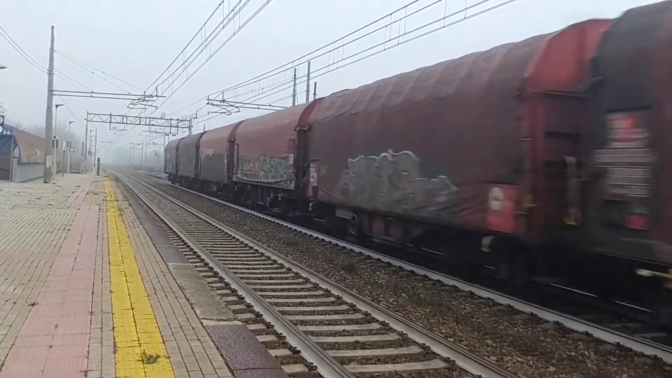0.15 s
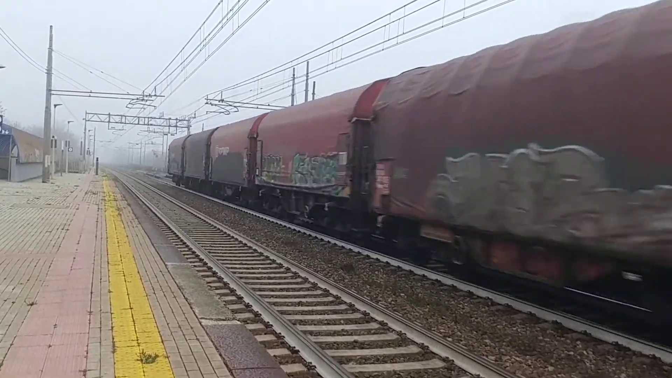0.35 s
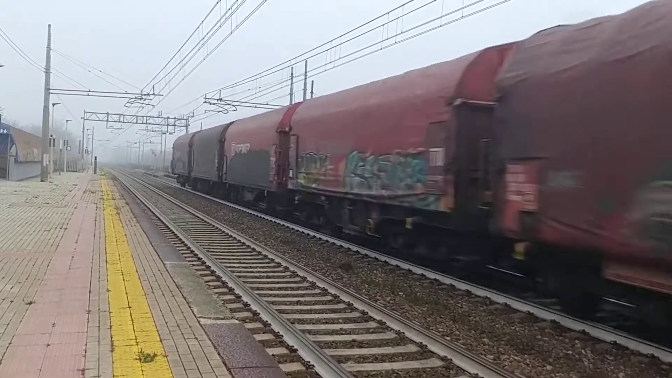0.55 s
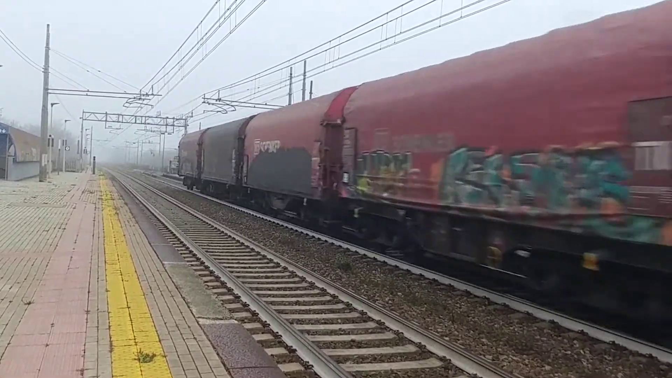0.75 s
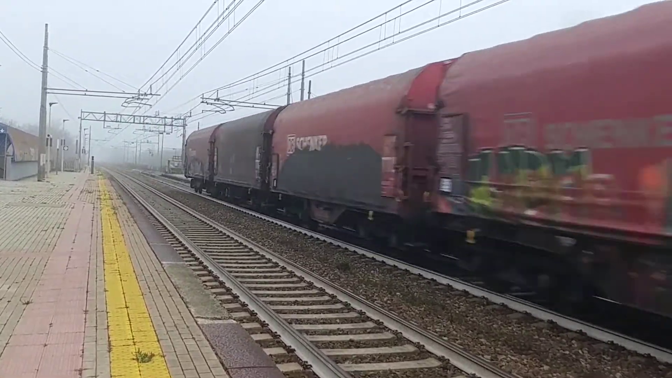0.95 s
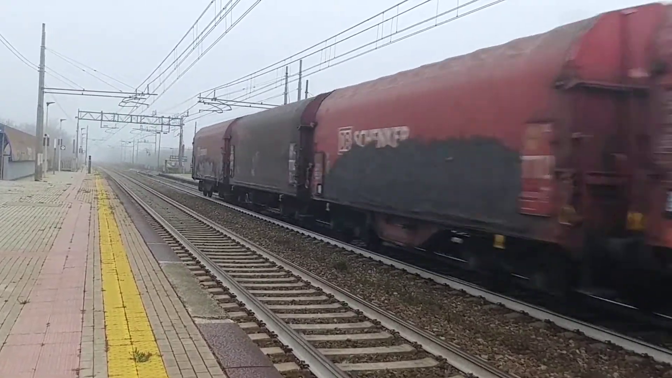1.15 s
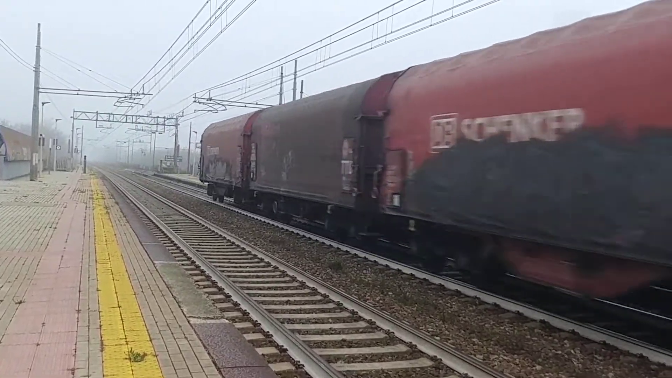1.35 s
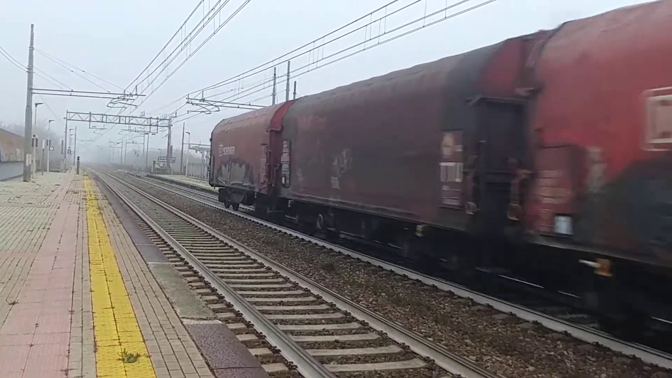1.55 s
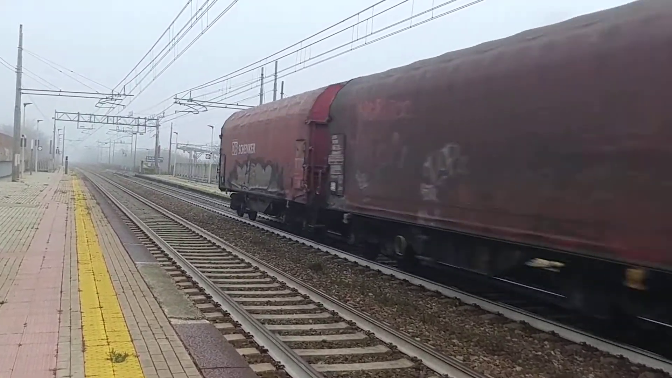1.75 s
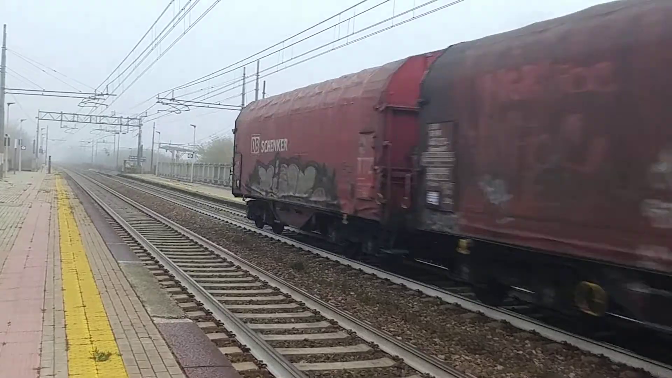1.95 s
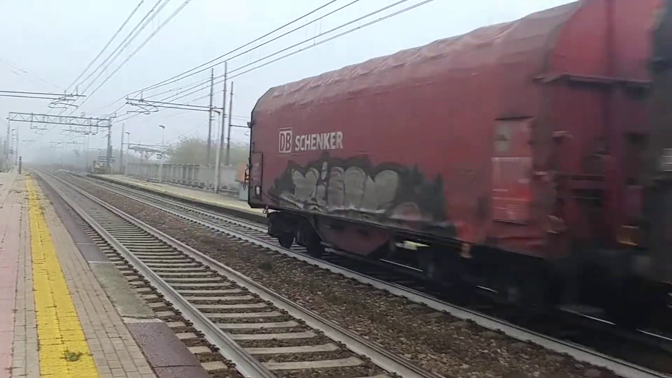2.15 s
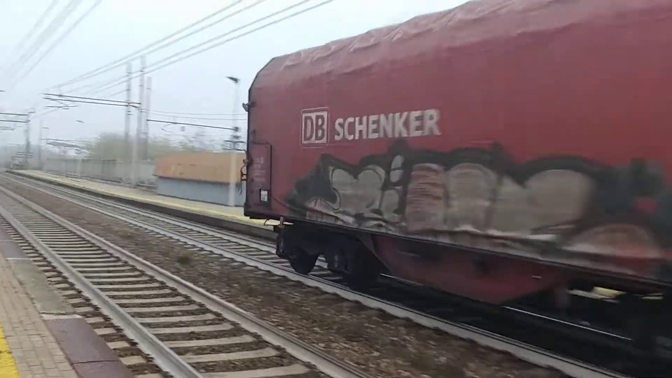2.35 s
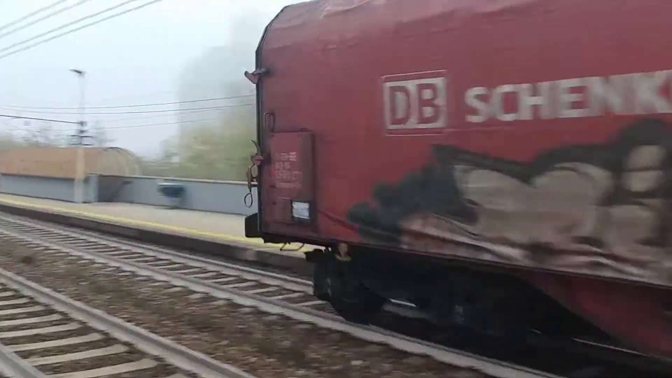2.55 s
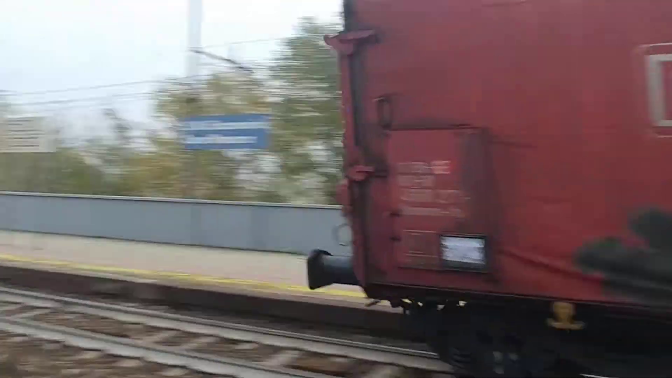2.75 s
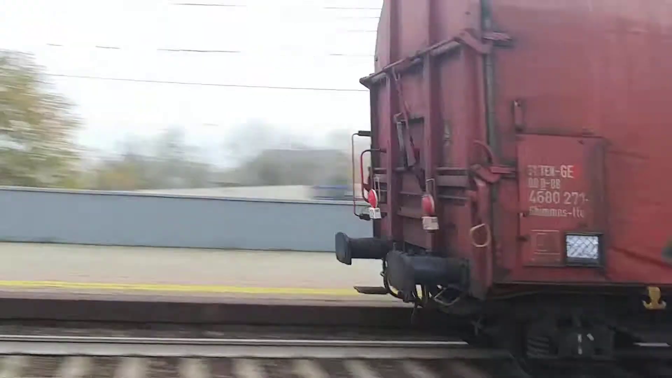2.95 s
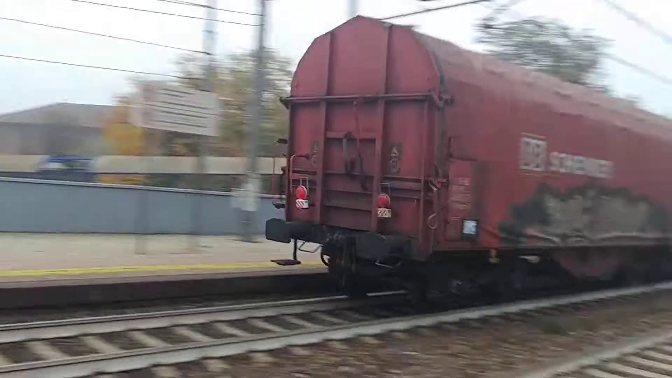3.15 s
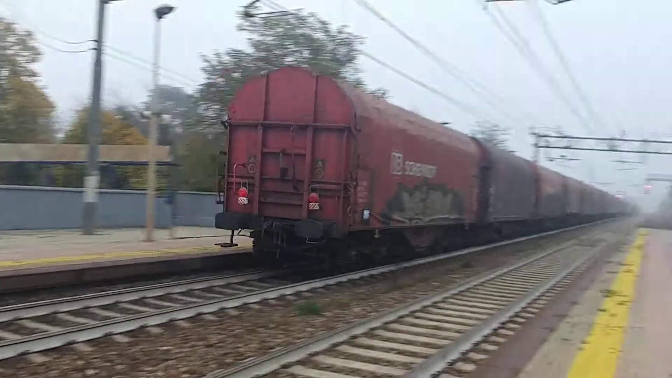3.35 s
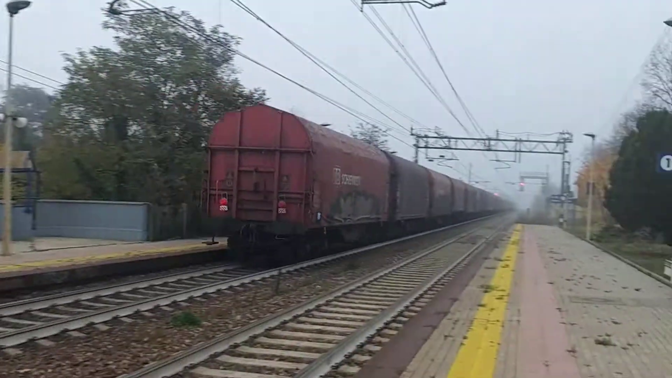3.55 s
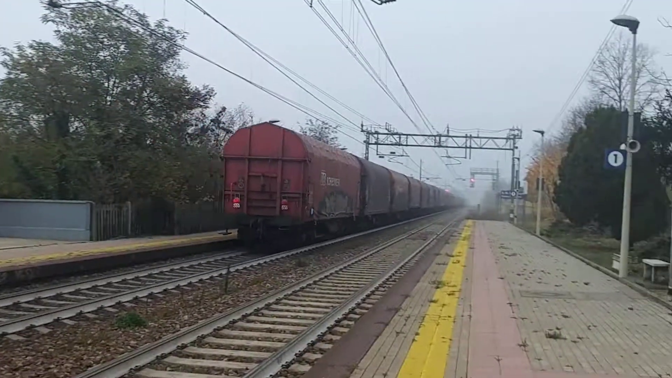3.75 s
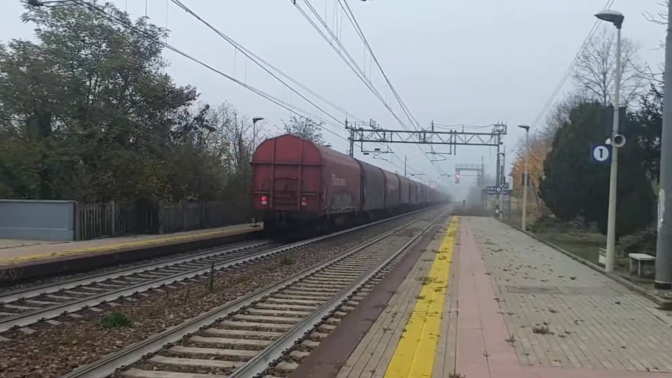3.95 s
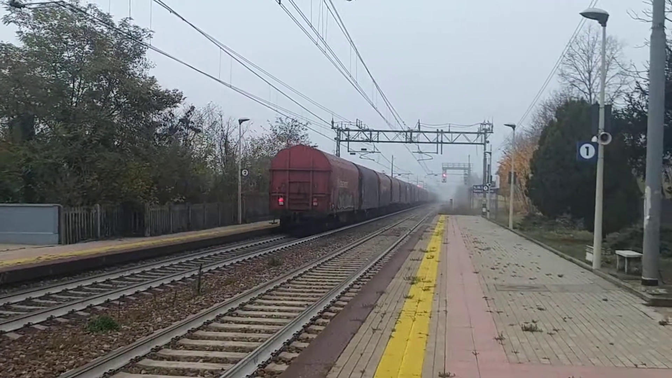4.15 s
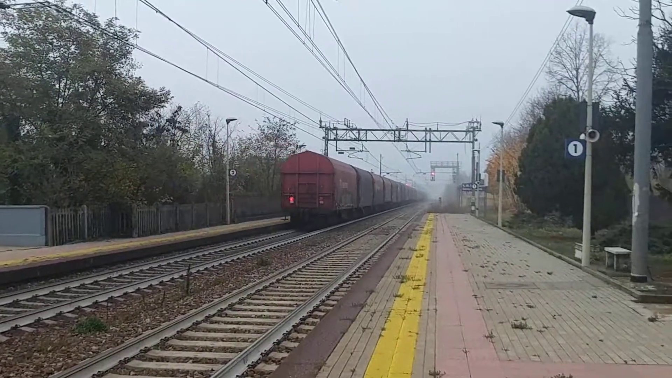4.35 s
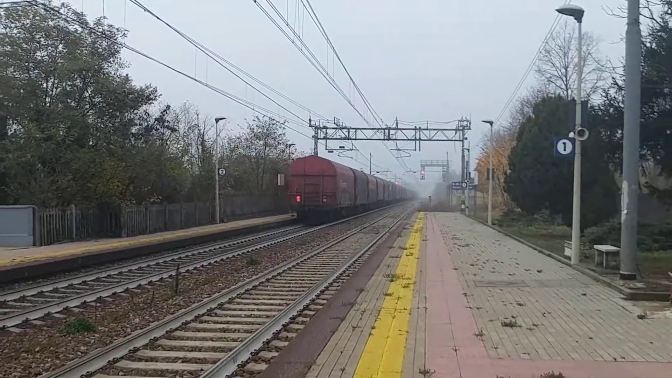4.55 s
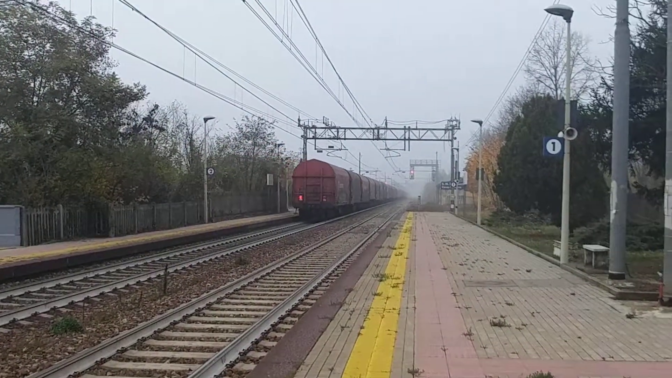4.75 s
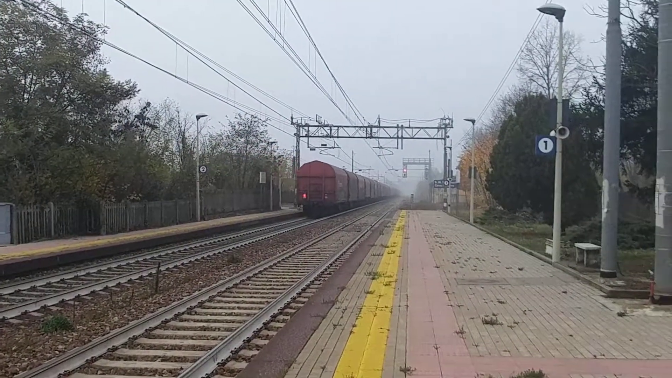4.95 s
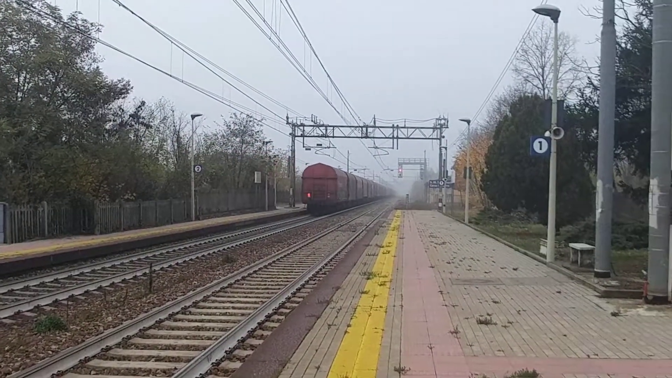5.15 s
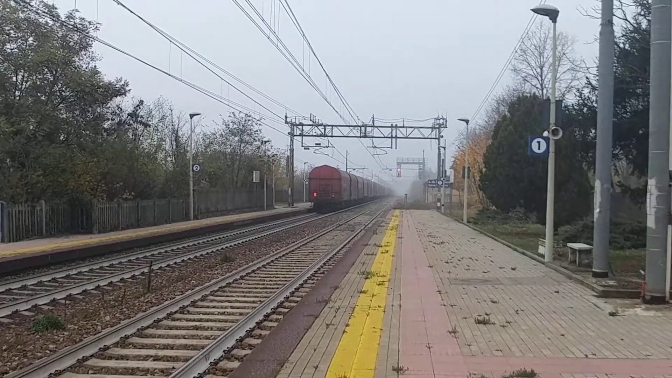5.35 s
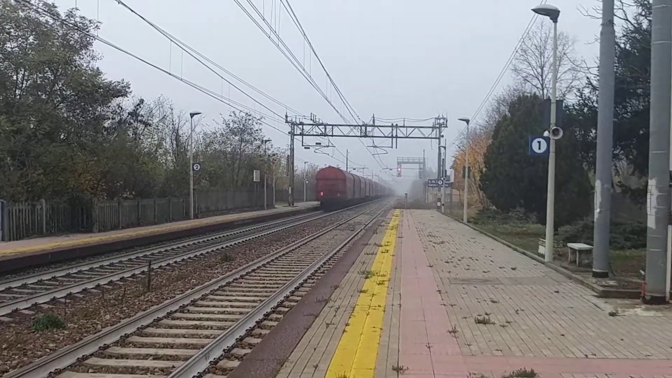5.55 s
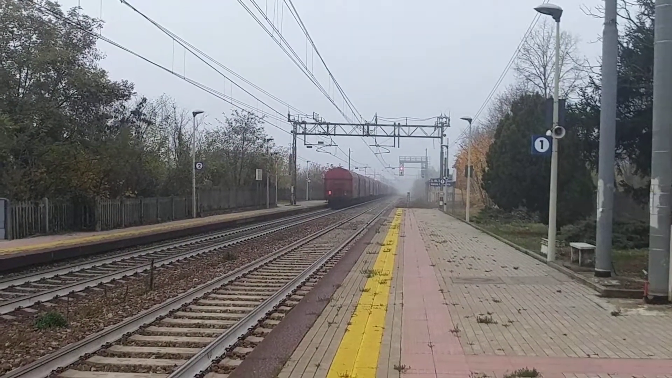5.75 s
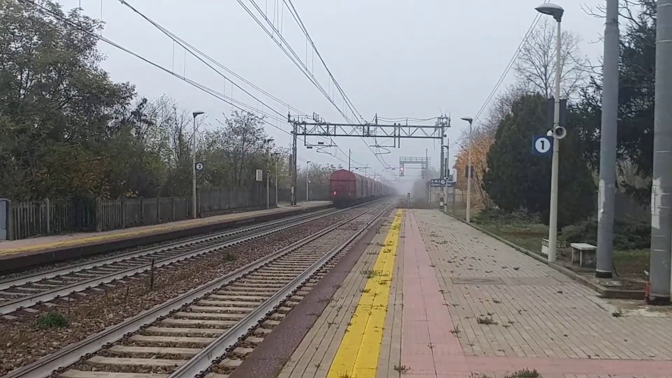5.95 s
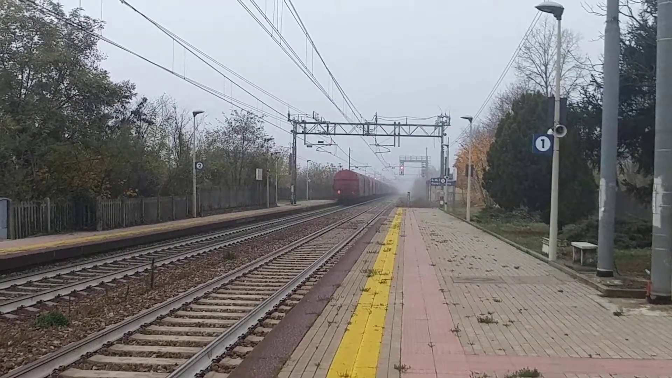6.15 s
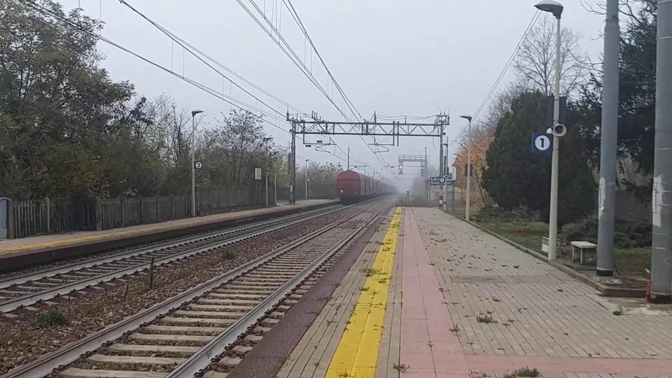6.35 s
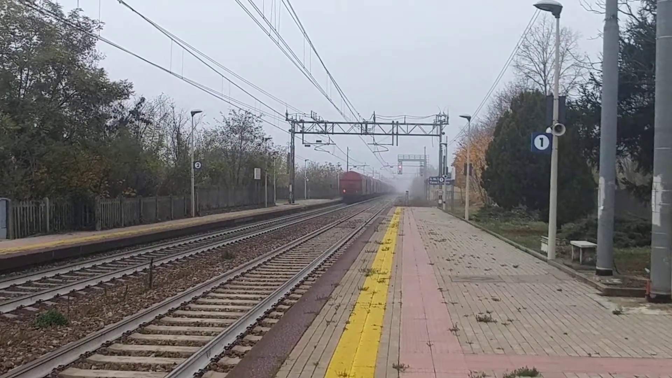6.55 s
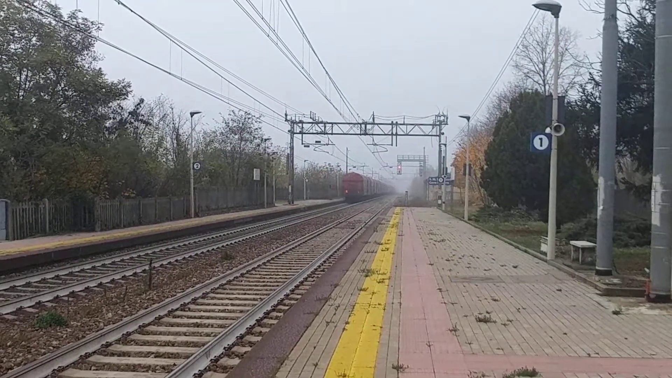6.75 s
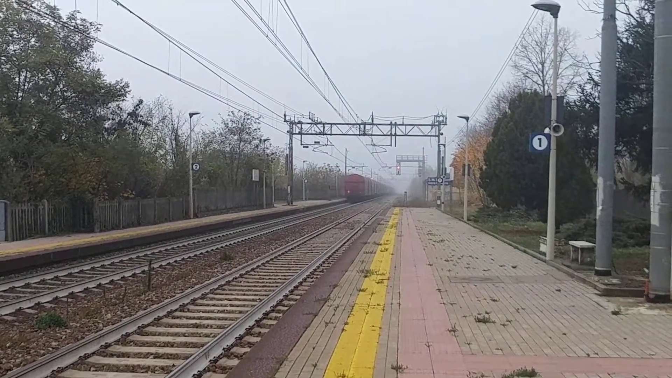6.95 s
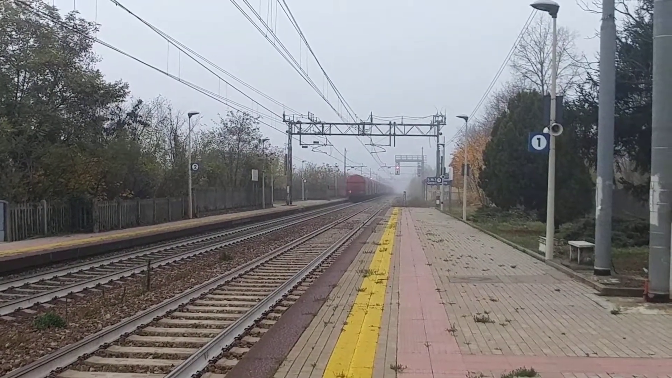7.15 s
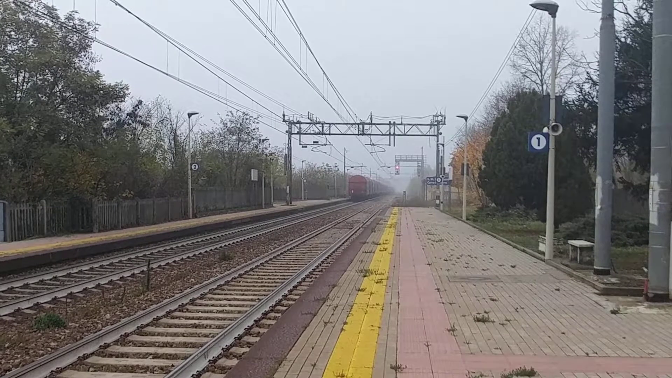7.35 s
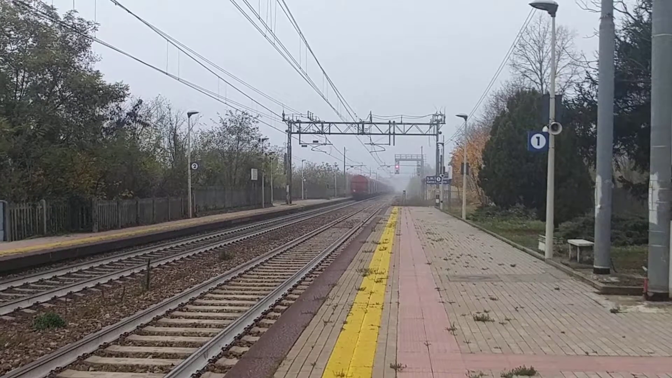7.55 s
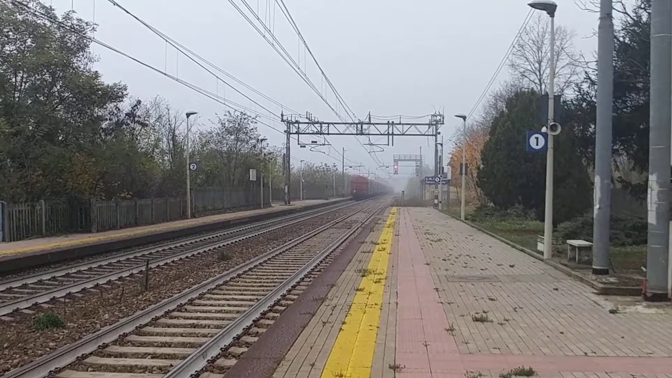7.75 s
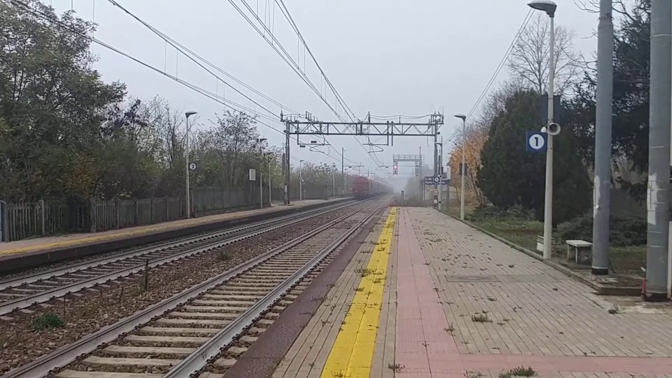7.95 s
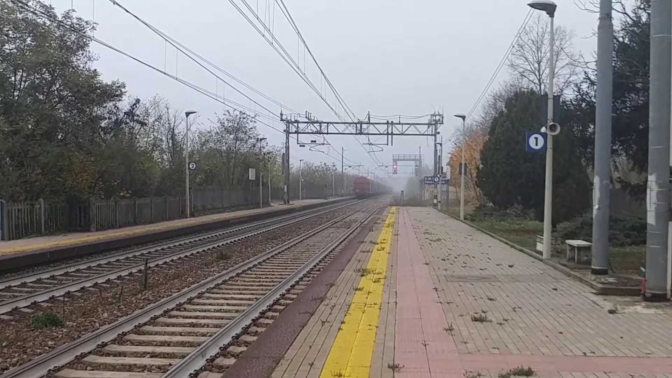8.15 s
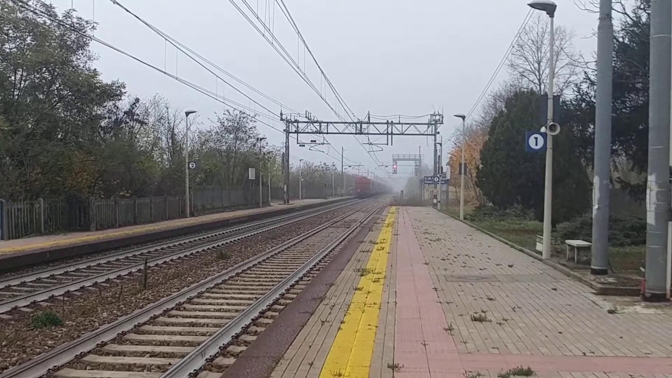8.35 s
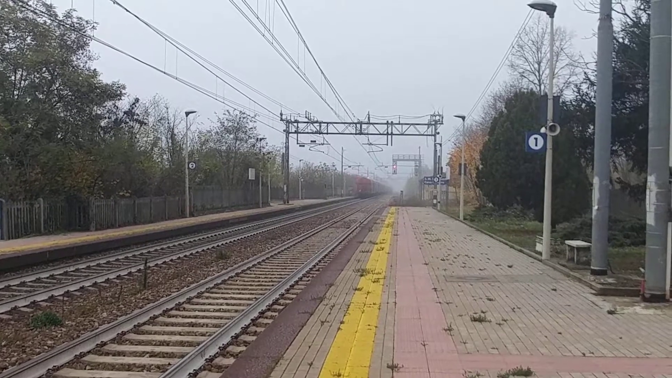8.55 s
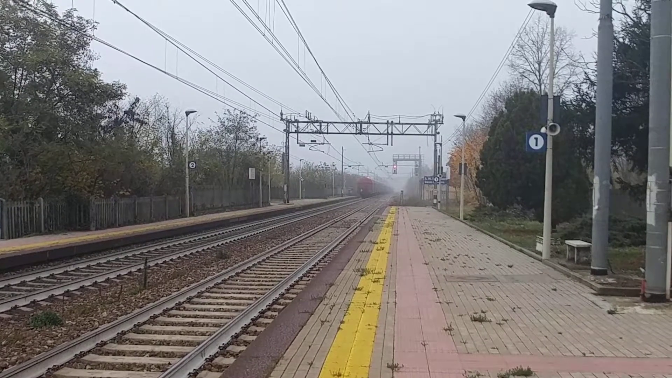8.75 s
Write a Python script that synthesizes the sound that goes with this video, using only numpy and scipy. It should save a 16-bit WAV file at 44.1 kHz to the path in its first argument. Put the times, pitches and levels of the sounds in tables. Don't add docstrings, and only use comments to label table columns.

```python
import sys
import numpy as np
from scipy import signal
from scipy.io import wavfile
from scipy.ndimage import uniform_filter1d, minimum_filter1d

SR = 44100
rng = np.random.default_rng(int(sys.argv[2]) if len(sys.argv) > 2 else 0)


def materialize(psi):
    bounded = np.clip(np.atleast_2d(psi).T, -1, 1)
    quanta = np.round(bounded * 32767).astype(np.int16)
    wavfile.write(sys.argv[1], SR, quanta)


def elevation(decibels):
    levels = np.asarray(decibels, float)
    return 10 ** (levels / 20)


N = 388521

SPEED_M_S, TRACK_GAP_M, SOUND_SPEED_M_S = 22.45, 11.7, 343
TAIL_ABREAST_S = 3.1
FAR_FROM_S = 3.79


def evened(x):
    return x / np.sqrt(np.mean(x ** 2) + 1e-20)


def over_hz(points, hz):
    f, *columns = np.transpose(points)
    return np.array([np.interp(np.log(hz + 1), np.log(f + 1), c) for c in columns])


def over_time(rows, t):
    s, *columns = np.transpose(rows)
    return np.array([np.interp(t, s, c) for c in columns])


# t/s, level/dB
ROAR = [(0, -10.5), (1.4, -5), (2.4, -5.8), (2.9, -5.6), (3.2, -4), (3.4, -9), (3.6, -13.5), (3.8, -15),
        (4.0, -18.5), (4.4, -20), (4.8, -21), (5.6, -23), (6.6, -24), (7.6, -25), (8.81, -27.5)]


def roar_db(t):
    return over_time(ROAR, t)


def camera(t):
    aim_from_deg, drift_deg_s = 14.8, 1.9
    turn_mid_s, turn_half_s = 2.84, 0.17
    ahead_m, short_deg = 0.83, 2.5
    swing = 0.5 + 0.5 * np.tanh((t - turn_mid_s) / turn_half_s)
    tail_m = SPEED_M_S * (t - TAIL_ABREAST_S)
    last_wagon = np.arctan2(TRACK_GAP_M, -tail_m - ahead_m) - np.radians(short_deg)
    return (1 - swing) * np.radians(aim_from_deg + drift_deg_s * t) + swing * last_wagon


# f/Hz, width/Hz, left/dB, right/dB, right lead/rad
MODES_AT_REST = [(69.6, 28.5, 14, 13, -0.024), (215.7, 70, 4.5, 2.5, -0.4), (618, 266, 13.5, 11, -0.49),
                 (836, 190, 4.5, -1.5, -0.15), (1317, 176, 13.5, 8.5, 0.65), (1928, 150, 10, 6, 0.47),
                 (2114, 150, -0.5, 10, 0.61), (2662, 55, 1, 6.5, -0.17), (3265, 240, 5, -14, -1.7),
                 (3780, 120, 2, 1, -0.55), (4346, 71, -1, 8, 0.16), (5120, 200, -14, 7, -0.77),
                 (5670, 145, 9, 2.5, 1), (6240, 220, -10, 7, 0.41), (7040, 170, 6, 4, 1),
                 (7700, 450, -20, 4, -0.69), (11260, 1100, 5, -4, 1)]
# f/Hz, likeness/0-1
ALIKE = [(30, 1), (100, 1), (250, 1), (700, 0.28), (1050, 0.26), (2200, 0.05), (3000, 0.42), (6000, 0.05),
         (12000, 0.44)]


def wheel_voice(hz):
    left, right = np.ones(len(hz)), np.ones(len(hz))
    both = np.clip(over_hz(ALIKE, hz)[0], 0, 1) + 0j
    for mode_hz, width_hz, left_db, right_db, lead_rad in MODES_AT_REST:
        bell = 1 / (1 + (2 * (hz - mode_hz) / width_hz) ** 2) ** 1.7
        left = left + elevation(2 * left_db) * bell
        right = right + elevation(2 * right_db) * bell
        both = both + elevation(left_db + right_db) * np.exp(1j * lead_rad) * bell
    return left, right, both


WHEELS_DB = [12.2, 7.6, 3, 7, 6.3, 9.4, 5.6, 5.9, 3.9]


def passing(t, hz):
    group_count, group_gap_m = 16, 12.34
    mic_gap_m, front_db = 0.15, 2.5
    body_bend = 1.6
    voice_left, voice_right, voice_both = wheel_voice(hz)
    heading = camera(t)
    left, right, both = 0, 0, 0
    for k in range(group_count):
        strength_db = WHEELS_DB[min(k, len(WHEELS_DB) - 1)]
        along_m = SPEED_M_S * (t - TAIL_ABREAST_S) + k * group_gap_m
        far_m = np.hypot(along_m, TRACK_GAP_M)
        bearing = np.arctan2(TRACK_GAP_M, -along_m) - heading
        power = (elevation(2 * (strength_db + front_db * np.cos(bearing))) / far_m ** 2)[:, None]
        emitted_hz = np.outer(1 + SPEED_M_S * along_m / far_m / SOUND_SPEED_M_S, hz)
        delay_s = mic_gap_m * np.tanh(body_bend * np.sin(bearing)) / SOUND_SPEED_M_S
        lead_rad = 2 * np.pi * np.outer(delay_s, hz)
        left = left + power * np.interp(emitted_hz, hz, voice_left)
        right = right + power * np.interp(emitted_hz, hz, voice_right)
        both = both + power * np.interp(emitted_hz, hz, voice_both) * np.exp(1j * lead_rad)
    return left, right, both / np.sqrt(left * right)


def far_share(t):
    since_s = np.maximum(t - FAR_FROM_S, 0)
    return 0.089 + 0.49 * (1 - np.exp(-since_s / 0.45)) + 0.12 * since_s


# t/s, f/Hz, half length/s, width/Hz, level/dB
RINGING = [(0.14, 3400, 0.091, 50, 12), (.62, 2800, .05, 50, 7), (0.65, 5400, .12, 88, 4),
           (1.14, 3860, .2, 80, 4.5), (1.44, 966, .12, 31, 7.5), (1.86, 310, .35, 100, 3),
           (2.77, 960, 0.13, 81, 3.5), (1.35, 3150, .077, 91, 8), (1.4, 2180, 0.8, 530, 0.5),
           (2.35, 1390, 0.29, 61, 7.5), (3.12, 810, .3, 260, 5), (2.28, 520, 0.15, 90, 3.5),
           (1.04, 3120, .1, 70, 7), (3.2, 3340, .2, 78, 7), (3.81, 154, 0.2, 100, 7.5),
           (8.6, 580, 0.41, 130, 3.5), (8.0, 70, .25, 50, 3.5), (3.39, 146, 0.16, 78, 7.5),
           (3.16, 1246, 0.7, 32, 5)]


def ringing_db(t, hz):
    sag_per_s = 0.16
    lift_db = 0
    for s, start_hz, half_s, width_hz, db in RINGING:
        since_s = t[:, None] - s
        off = (hz - start_hz * (1 - sag_per_s * since_s)) / width_hz
        lift_db = lift_db + db * np.exp(-off ** 2 - (since_s / half_s) ** 2)
    return lift_db


# f/Hz, density/dB per Hz
ABREAST = [(25, -53), (42, -26), (58, -11.5), (120, -7), (310, -1.5), (440, -9), (930, -1.5), (1560, -10),
           (2200, -15), (2550, -17.5), (3500, -16.5), (7000, -27), (12000, -32.5), (15500, -38.5)]
# f/Hz, density/dB per Hz
GONE = [(25, -47), (42, -12), (58, -4.5), (120, -5.5), (250, -2.5), (380, -15), (950, -15.5), (1500, -20.5),
        (2300, -28.5), (3500, -27.5), (6500, -41.5), (8200, -44), (11400, -61), (15500, -87)]
# f/Hz, left/dB, right/dB
PORTS = [(1470, -7, -4.5), (2530, -2, -2), (3600, -2.5, -1), (5060, -0.5, -1), (5950, -2.5, -0.5),
         (7510, 0.5, 7.5), (8380, -2, -1.5), (8930, -1.5, -10), (9800, 10.5, -9), (10740, 1.5, 8),
         (11400, -1, -0.5)]
# f/Hz, level/dB
SHADE = [(300, -3.5), (1500, 3), (2500, 4), (2850, -5), (3250, 0), (3550, 0.5), (3850, -1.5), (4200, 4.5),
         (8000, -2.4)]
LAYER_EDGES_HZ = [450, 1600, 8800]


def train():
    frame, hop = 4096, 1024
    layer_db = np.array([[-6], [0], [-5], [-25.5]])
    fog_loss_db_per_100m = [-0.3, 0, 5.5, 11]
    tail_roar_db, tail_roar_s = 1.5, 0.35
    patch_db, top_patch_db, top_patch_hz = 0.82, 1.1, 10900
    near_lift_db = 2

    frames, hz = N // hop + 6, np.fft.rfftfreq(frame, 1 / SR)
    t = (np.arange(frames) - 2) * hop / SR
    left, right, alike = passing(t, hz)
    gone = far_share(t)[:, None]
    broad_db = (1 - gone) * over_hz(ABREAST, hz) + gone * over_hz(GONE, hz) + ringing_db(t, hz)
    shape = np.sqrt([left, right]) * elevation(broad_db + over_hz(PORTS, hz)[:, None])
    shape[1] *= elevation(gone * over_hz(SHADE, hz))

    a, b, c, d, patches = np.moveaxis(rng.standard_normal((frames, len(hz), 5)), 2, 0)
    patches = uniform_filter1d(patches, size=28, axis=1)
    patches = evened(uniform_filter1d(patches, size=4, axis=0))

    away_100m = SPEED_M_S * np.maximum(t - FAR_FROM_S, 0) / 100
    boom = np.exp(-((t - TAIL_ABREAST_S) / tail_roar_s) ** 2)
    levels_db = roar_db(t) + layer_db - np.outer(fog_loss_db_per_100m, away_100m)
    levels_db = levels_db + np.outer([0, tail_roar_db, 0, 0], boom)
    layer = np.searchsorted(LAYER_EDGES_HZ, hz)
    power = np.array([(shape[:, :, layer == k] ** 2).mean(0).sum(1) for k in range(4)])
    trim_db = (levels_db - 10 * np.log10(power))[layer].T
    trim_db = uniform_filter1d(trim_db, size=9, axis=1)

    first, other = a + 1j * b, c + 1j * d
    apart = np.sqrt(np.clip(1 - abs(alike) ** 2, 0, 1))
    z = np.array([first, alike * first + apart * other])
    rough_db = (patch_db + top_patch_db * (hz > top_patch_hz)) * patches
    z = z * shape * elevation(trim_db + rough_db + near_lift_db * (1 - gone))
    sound = signal.istft(z.transpose(0, 2, 1), nperseg=frame, noverlap=frame - hop)[1]
    return sound[:, 2 * hop:2 * hop + N]


def wander(lo_hz, hi_hz):
    t = np.arange(N // 64 + 2) * 64 / SR
    z = 0
    for f in np.geomspace(lo_hz, hi_hz, 40):
        z = z + np.sin(2 * np.pi * (f * t + rng.random())) / np.sqrt(f)
    return np.interp(np.arange(N) / SR, t, evened(z))


def draught():
    band = signal.butter(2, [30, 100], "bandpass", fs=SR, output="sos")
    level_db = -33 + roar_db(np.arange(N) / SR)
    return evened(signal.sosfilt(band, rng.standard_normal((2, N)))) * elevation(level_db)


# t/s, level/dB
RAIL_SIZZLE = [(0, -68), (4, -60), (6, -63), (8.81, -68.5)]


def rail_sizzle():
    band = signal.butter(3, [12100, 12950], "bandpass", fs=SR, output="sos")
    hiss = signal.sosfilt(band, rng.standard_normal((3, N)))
    ports = hiss[:2] + hiss[2]
    return evened(ports) * elevation(over_time(RAIL_SIZZLE, np.arange(N) / SR))


# t/s, peak level/dB, f/Hz, left over right/dB
KNOCKS = [
    (6.918, -26, 1050, -3),
    (7.131, -21, 1110, -2),
    (7.196, -21, 1150, -2),
    (7.245, -26, 1200, -2),
    (7.392, -21, 1110, -3),
    (7.543, -23, 1120, -2),
]


def knocks():
    out, t = np.zeros((2, N)), np.arange(1500) / SR
    for s, db, hz, tilt_db in KNOCKS:
        ring = np.sin(2 * np.pi * hz * t) * (t / 0.0043) * np.exp(1 - t / 0.0031)
        out[:, round(s * SR):][:, :len(t)] += elevation(db + np.array([[tilt_db], [0]])) * ring
    return out


def scene():
    flicker = elevation(0.32 * wander(6.0, 40) + 1.0)
    return train() * flicker + draught() + rail_sizzle() + knocks()


def roll_off(x):
    return signal.sosfilt(signal.butter(12, 15490, fs=SR, output="sos"), x)


def record(dry):
    limit_db, recovery_db_s, edge_hz = -0.35, 380, 15500
    peak_db = 20 * np.log10(abs(dry).max(0) + 1e-9)
    fall_db = np.arange(N) * recovery_db_s / SR
    held_peak_db = np.maximum.accumulate(peak_db + fall_db) - fall_db
    over_db = np.maximum(held_peak_db - limit_db, 0)
    ahead_db = uniform_filter1d(-minimum_filter1d(-over_db, size=64), size=64)
    held = np.clip(dry / elevation(ahead_db), -1, 1)
    lowpass = signal.firwin(255, edge_hz, window=("kaiser", 9), fs=SR)
    mix = signal.oaconvolve(held, lowpass[None], "same")
    return roll_off(mix)


dry = scene()
out = record(dry)
materialize(out)
```